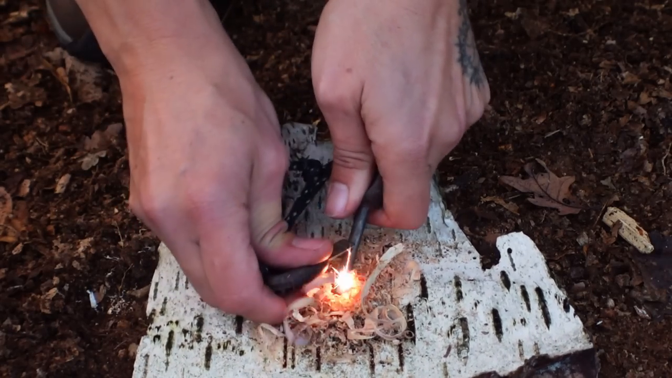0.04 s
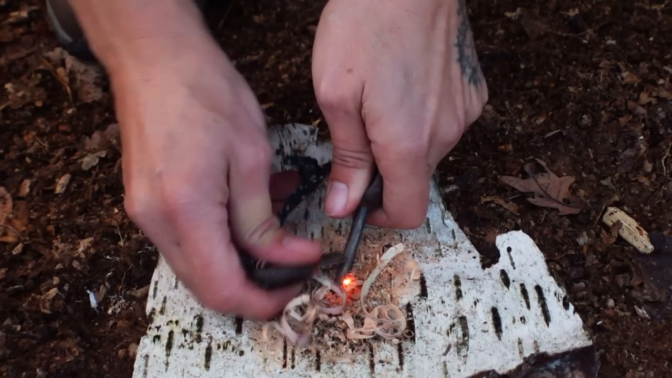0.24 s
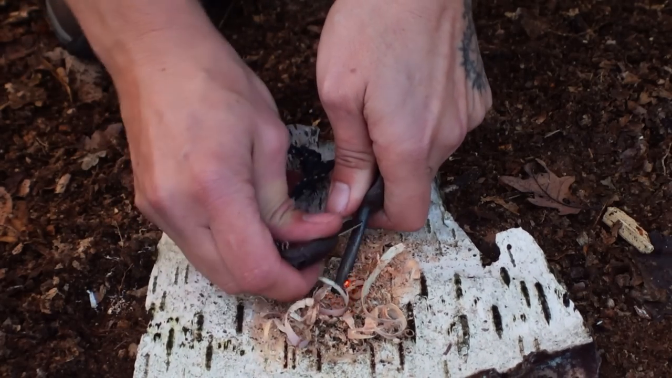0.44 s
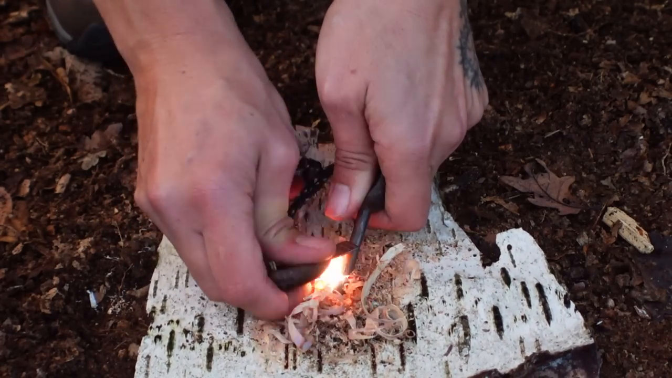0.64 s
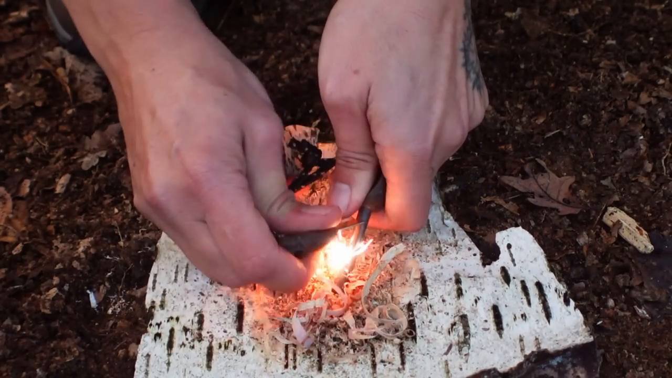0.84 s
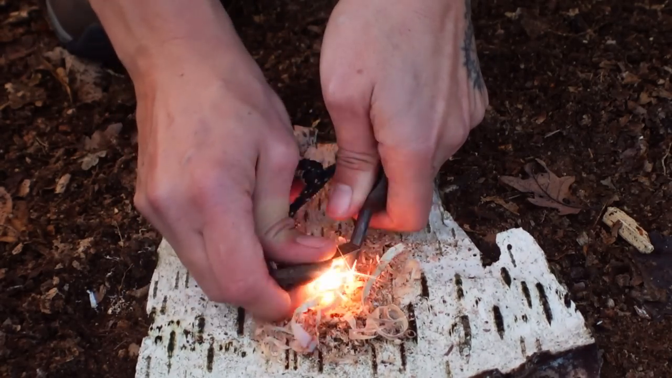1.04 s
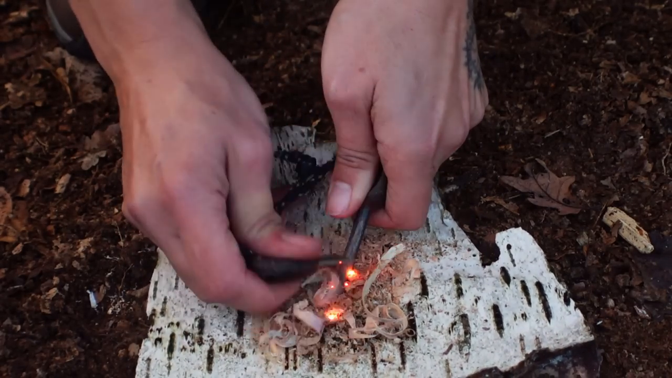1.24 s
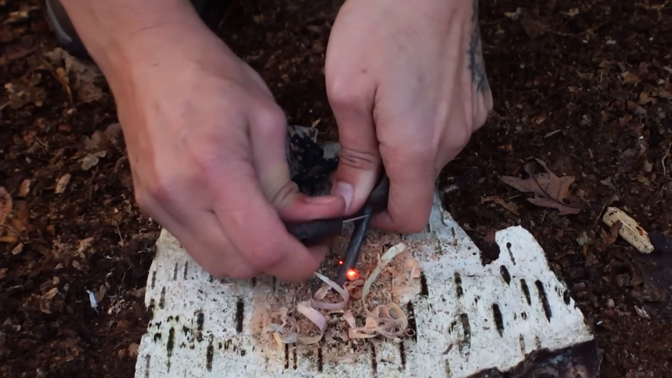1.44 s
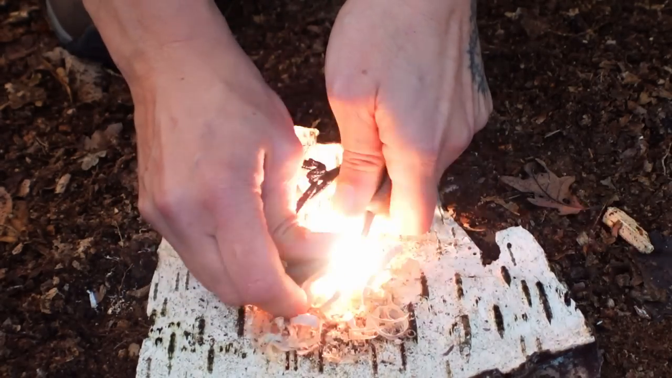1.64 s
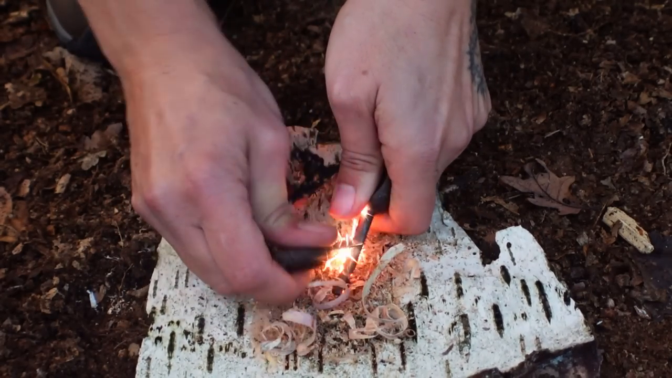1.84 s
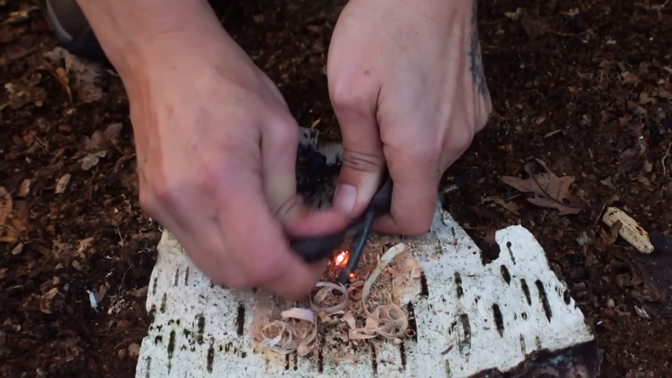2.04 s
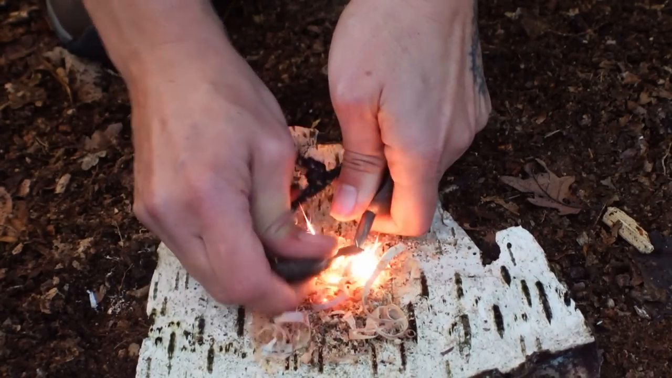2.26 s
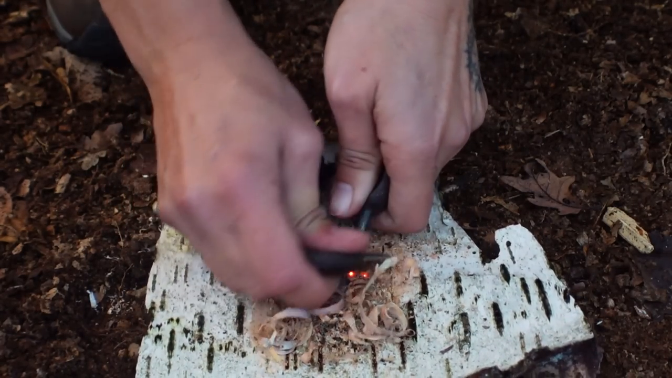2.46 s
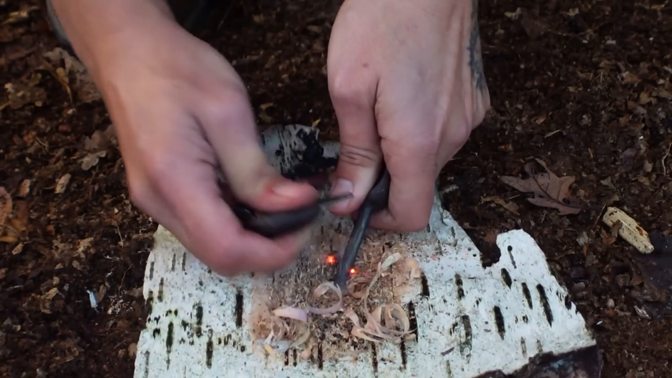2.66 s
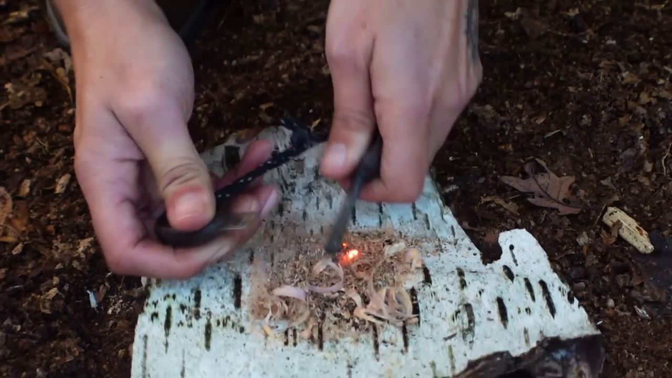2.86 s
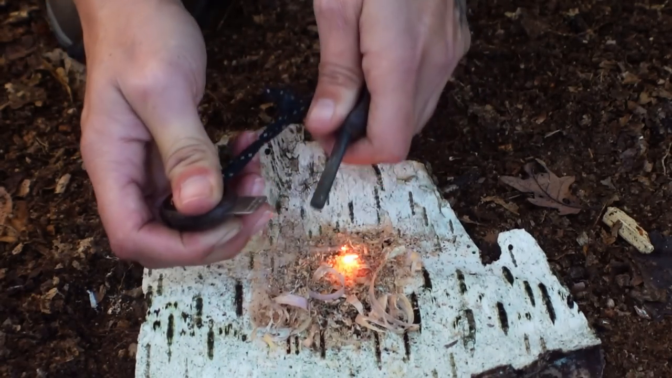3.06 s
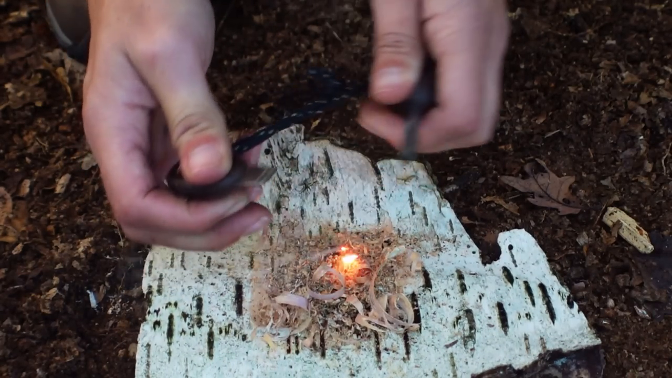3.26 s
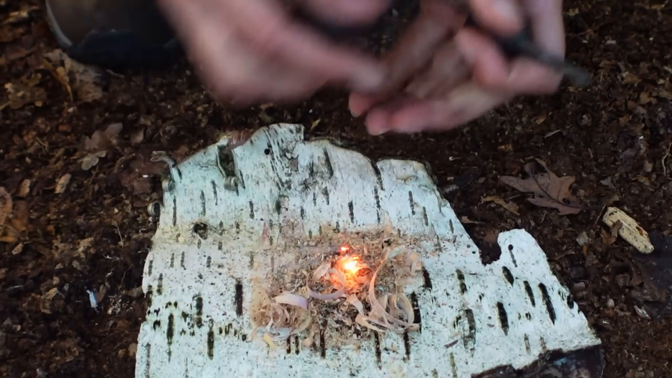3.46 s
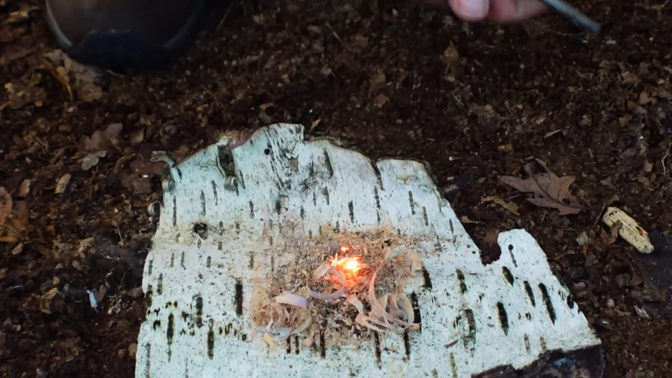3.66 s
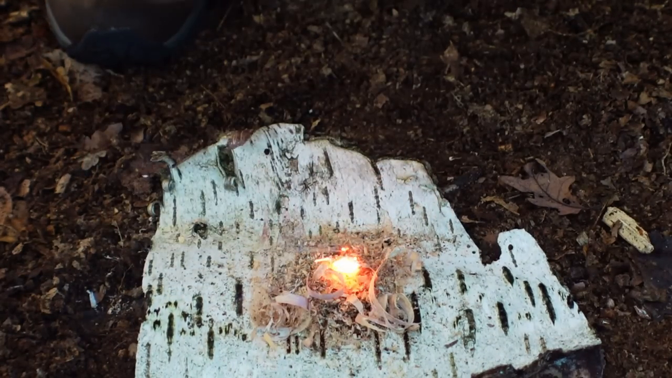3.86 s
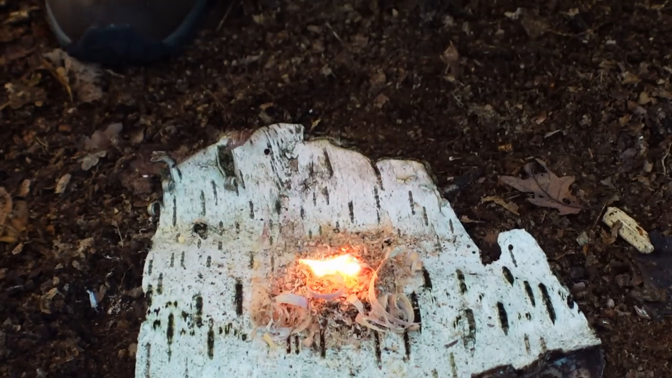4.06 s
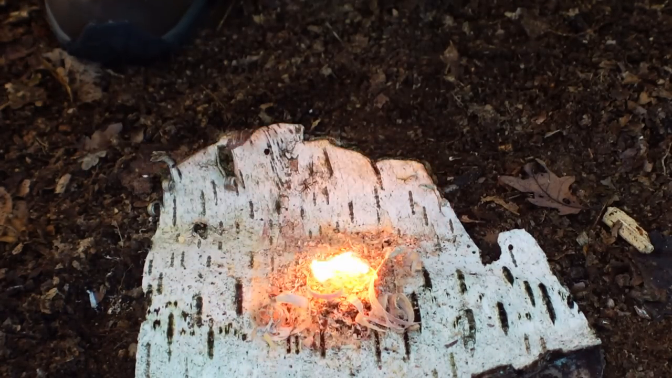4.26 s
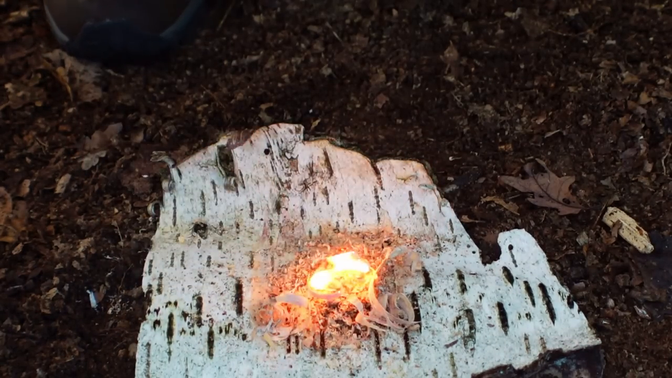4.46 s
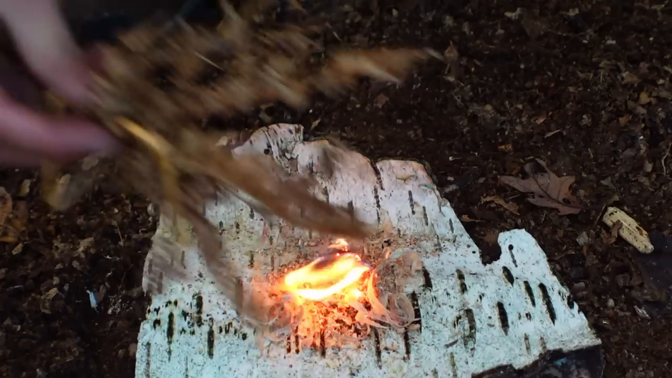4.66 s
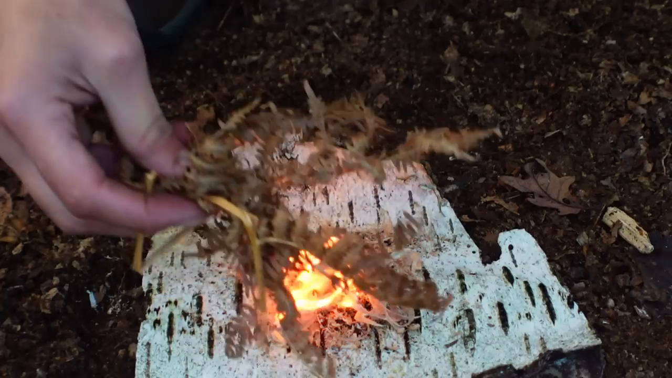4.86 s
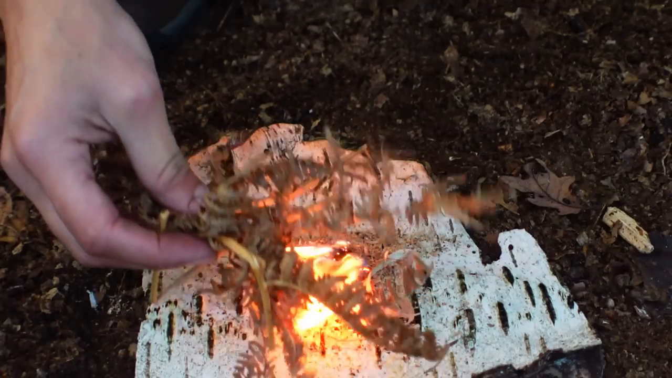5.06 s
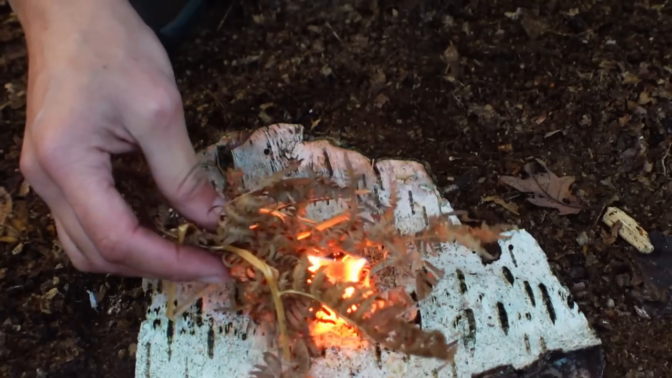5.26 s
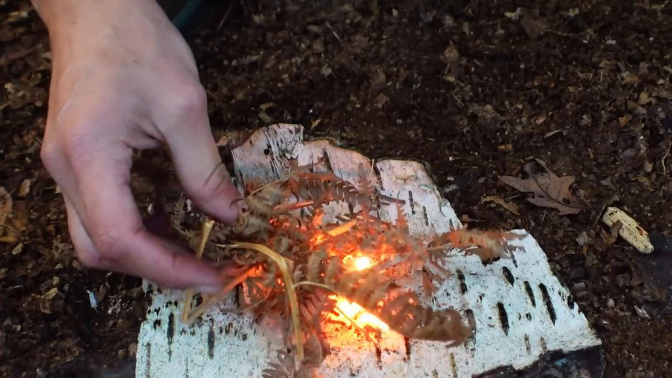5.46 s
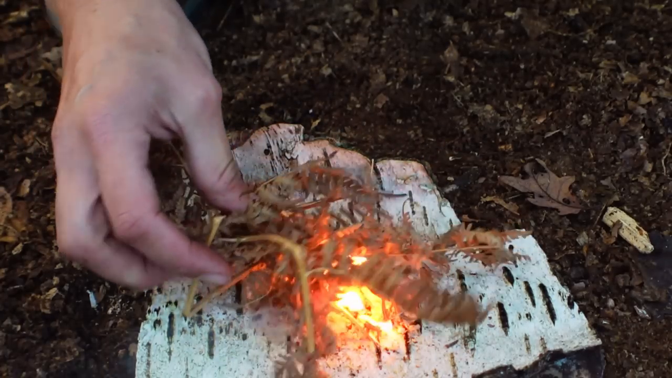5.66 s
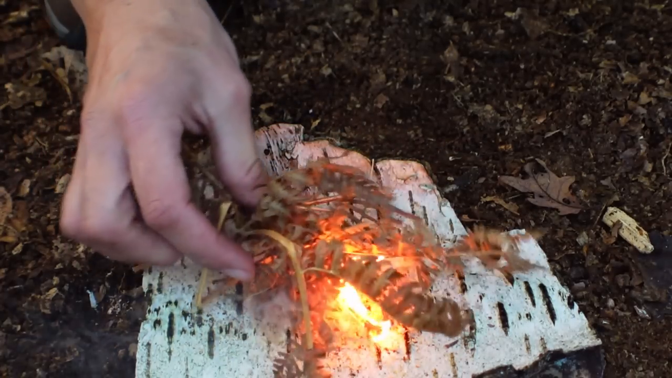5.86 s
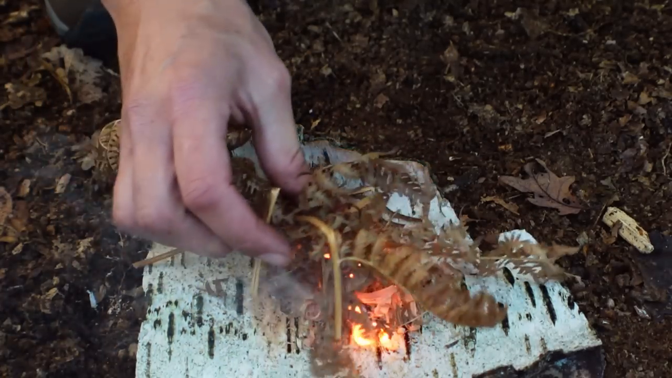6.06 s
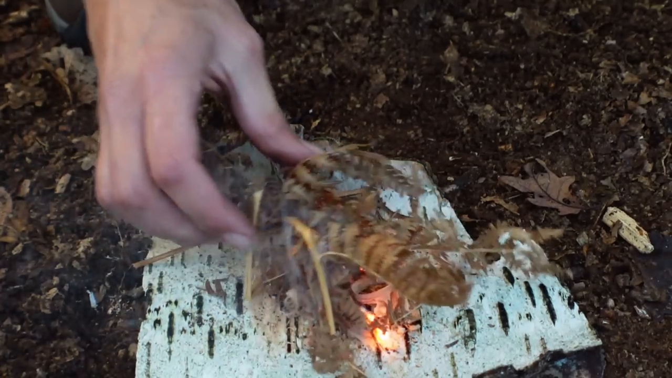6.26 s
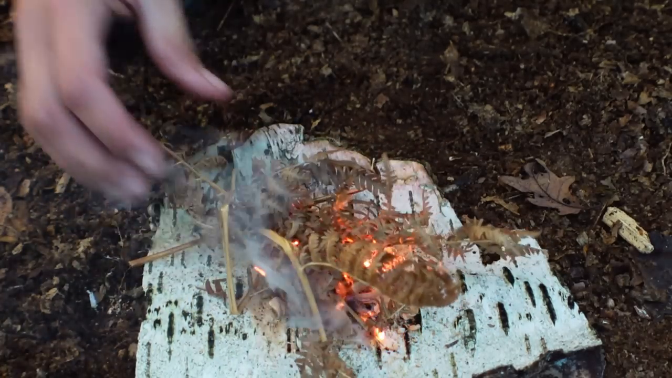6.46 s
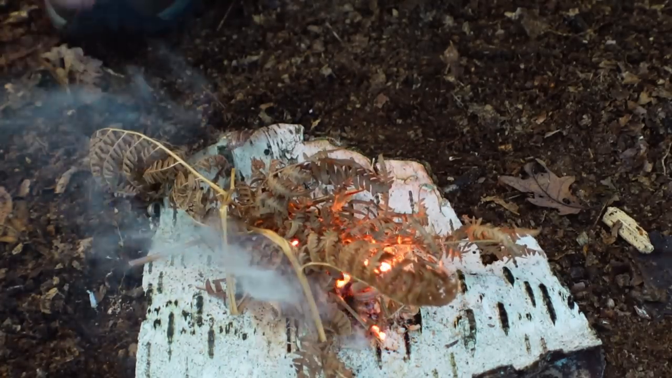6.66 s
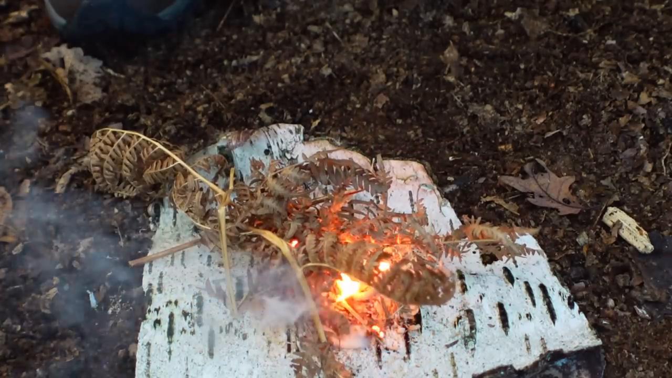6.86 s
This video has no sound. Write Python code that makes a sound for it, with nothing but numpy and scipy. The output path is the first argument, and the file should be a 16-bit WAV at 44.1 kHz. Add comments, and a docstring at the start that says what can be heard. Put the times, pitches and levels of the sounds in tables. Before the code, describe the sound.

Steel scrapes in short gritty strokes along a metal rod, snapping sparks, then a clink, a soft flame hiss and dry fern crackle outdoors.

```python
"""Short hard scrapes of a steel striker on a ferro rod, snapping sparks, then hiss and crackle of a small flame.
Each stroke is a run of catch-and-slip pushes coloured by the bite of the edge and its place along the rod.
Chips, taps, clinks and fibres are single snaps through resonant bodies; squeaks are lightly chattering drags.
Flame, dry fern and a faint forest rush are coloured noise spread in stereo, the last with a low sine hum."""
import sys
import numpy as np
from scipy import signal
from scipy.fft import rfft, irfft, next_fast_len
from scipy.io import wavfile
from scipy.ndimage import map_coordinates

SR = 44100
rng = np.random.default_rng(int(sys.argv[2]) if len(sys.argv) > 2 else 0)


def unload_wav(signal):
    """Save mono or channel-first audio to the path in sys.argv[1] as 16-bit WAV at rate SR, clipped to [-1, 1]."""
    wavfile.write(
        sys.argv[1],
        SR,
        np.round(np.clip(np.atleast_2d(signal).T, -1, 1) * 32767).astype(np.int16),
    )


N = 304995

# pushes of the striker along the rod:
# (start [s], length [s], level [dB], fade over the push [dB], bite [0 skidding - 1 cutting])
PUSHES = [(.006, 0.051, -29.5, -4, 0.088), (0.099, 0.049, -40.5, -4, 1), (0.158, 0.024, -26.5, -0.5, 0.024),
          (.302, 0.082, -35.5, 14.5, 0.3), (.521, 0.053, -35, -1.5, 0.17), (0.572, 0.044, -32.5, 8, 0.43),
          (.621, 0.027, -36.5, 4, 0.82), (0.646, 0.0092, -27, 3, .2), (0.657, 0.028, -45, 9, 0.54),
          (.699, 0.058, -37, 5, 0.94), (0.771, 0.05, -37, 11, 0.34), (.831, 0.078, -35, 16, 0.59),
          (0.925, 0.024, -36, 8, 0.74), (0.983, 0.025, -34, -1, .3), (1.006, 0.052, -30.5, 8, 0.26),
          (1.06, 0.028, -30.5, 8, 0.88), (1.122, 0.035, -26, 1.5, 0.29), (1.155, 0.07, -31.5, 4, 1),
          (1.236, 0.052, -39, 7, 0.51), (1.642, 0.047, -34.5, -0.5, 0.23), (1.694, 0.073, -34, 12, 0.83),
          (1.767, 0.063, -38, 14, 0.32), (1.819, 0.085, -34.5, 12.5, 1), (1.91, 0.034, -36, 3, 0.45),
          (2.094, 0.059, -36.5, 4, 0.29), (2.141, 0.063, -32.5, -0.5, 0.74), (2.205, 0.035, -31, 11, 0.3),
          (2.24, .014, -34.5, 2, .9), (2.259, 0.022, -25.5, -1, .85), (2.298, .032, -31.5, 8, .95),
          (2.335, 0.066, -34.5, 9.5, 0.36), (2.456, 0.083, -45, 1, 0.05)]
# long strokes down the rod, rubbing lightly: (start [s], end [s], rubbing level [dB])
STROKES = [(-.25, 0.41, -55), (0.51, 0.953, -52.5), (0.971, 1.27, -51), (1.635, 1.943, -55.5),
           (2.079, 2.9, -52.5)]
# the fern pressed down, shifted and let go: (middle [s], length [s], level [dB])
RUSTLES = [(5.179, 0.25, -53), (5.41, .2, -55.5), (5.62, .2, -58), (6.028, 0.23, -62.5),
           (6.301, .15, -61.5), (6.878, 0.36, -55.5)]


def amp(db):
    """Gain of a level in dB."""
    return 10 ** (np.asarray(db) / 20)


def unit(x):
    """x scaled to rms 1."""
    return x / np.sqrt(np.mean(x ** 2) + 1e-20)


def along(points, hz):
    """(Hz, value) points interpolated on a log frequency axis."""
    f, v = np.transpose(points)
    return np.interp(np.log(hz + 1), np.log(f + 1), v)


def curve(rows):
    """(s, value) rows as one value per sample."""
    return np.interp(np.arange(N) / SR, *np.transpose(rows))


def wobble(knots_per_s, size):
    """A smooth random curve through normally distributed knots."""
    knots = rng.standard_normal(int(size * knots_per_s / SR) + 4)
    return map_coordinates(knots, [np.arange(size) * knots_per_s / SR])


def swells(rows):
    """(middle s, length s, dB) rows as one gain that rises and falls smoothly for each."""
    t = np.arange(N) / SR
    return sum(amp(db) * np.cos(np.pi * np.clip((t - middle) / length, -.5, .5)) for middle, length, db in rows)


def octaves(hz, centre):
    """Distance from a centre in octaves."""
    return np.log2((hz + 1) / centre)


def above(hz, corner):
    """Octaves above a corner, 0 below it."""
    return octaves(np.maximum(hz, corner), corner)


def hump(hz, centre, width):
    """A bell of height 1, width in octaves."""
    return np.exp(-.5 * (octaves(hz, centre) / width) ** 2)


def filtered(x, response):
    """x times a response of frequency."""
    m = next_fast_len(N + SR // 2)
    return irfft(rfft(x, m) * response(np.fft.rfftfreq(m, 1 / SR)), m)[..., :N]


def ring(x, colour, size=2048):
    """x through a causal minimum-phase body whose gain in dB is colour(Hz)."""
    cepstrum = irfft(np.log(amp(colour(np.fft.rfftfreq(size, 1 / SR))) + 1e-6))
    cepstrum[1:size // 2] *= 2
    cepstrum[size // 2 + 1:] = 0
    return signal.fftconvolve(x, irfft(np.exp(rfft(cepstrum))))


def add(track, s, x):
    """Mix x into the track at time s."""
    part = track[max(0, round(s * SR)):][:len(x)]
    part += x[:len(part)]


def stereo(source, colour, alike):
    """Two draws of a source, coloured and spread by left-right likeness, rms 1."""
    def turn(hz):
        return np.arccos(np.clip(along(alike, hz), -1, 1)) / 2

    def mid_side(hz):
        return amp(colour(hz)) * [np.cos(turn(hz)), np.sin(turn(hz))]

    mid, side = filtered(np.array([source(), source()]), mid_side)
    return unit(np.array([mid + side, mid - side]))


def grit(hits_per_s, spread_db, size):
    """Tiny fractures at random moments and of uneven strength, rms 1."""
    hits = rng.random(size) < hits_per_s / SR
    strength_db = spread_db * np.minimum(rng.standard_normal(size), 2)
    return unit(hits * rng.choice([-1, 1], size) * amp(strength_db))


def snap(db, colour, tail, t60_s, tear=0.18, tear_s=0.00044):
    """One sharp release, a brief tearing and dying splinters; db is the level of its first 3 ms."""
    t = np.arange(SR // 20) / SR
    push = rng.standard_normal(len(t)) * (tail * amp(-60 * t / t60_s) + tear * np.exp(-t / tear_s))
    push[0] -= 1
    x = ring(push, colour)
    return amp(db) * x / np.sqrt(np.mean(x[:132] ** 2))


def tool_db(hz, ring_db=3, width_hz=40):
    """The hand-held tools' colour: a broad shape with resonances damped by the fingers."""
    # broad shape: (frequency [Hz], gain [dB])
    shape = [(25, -47), (100, -26), (300, -21.5), (520, -12.5), (850, -4), (1400, -3.5), (2200, -2),
             (2700, 1.5), (3200, -5), (3800, -3.5), (4500, -8.5), (6200, -7.5), (7500, -10.5), (10000, -13),
             (15500, -18.5)]
    # narrow resonances: frequency [Hz]
    ring_hz = [860, 1150, 1400, 1620, 1800, 2550, 2840, 3750, 4000, 4630, 4880, 5520, 6150, 6640, 7000]
    return along(shape, hz) + ring_db * sum(1 / (1 + ((hz - c) / width_hz) ** 2) for c in ring_hz)


def contact_db(depth_db, knots_per_octave=3.11):
    """Each place of contact favours resonances of its own: a random ripple over frequency."""
    knots = rng.standard_normal(120)

    def ripple(hz):
        place = [knots_per_octave * np.log2(1 + hz / 300)]
        return depth_db * map_coordinates(knots, place, mode="nearest") * np.minimum(hz / 1500, 1)

    return ripple


def slipping(slips_per_s, scatter, size):
    """A sawtooth that leaps to 1 at each slip and dies away; scatter makes the slips uneven."""
    settle_s = 0.0058
    t = np.arange(size) / SR
    slips = np.append(0, np.cumsum(np.exp(scatter * rng.standard_normal(size=64)) / slips_per_s))
    last_slip = slips[np.searchsorted(slips, t, side="right") - 1]
    return np.exp(-(t - last_slip) / settle_s)


def rub(length, db, fade_db, slip_db, scatter, ripple_db, colour):
    """One push of the edge, catching and slipping; colour(Hz, 0 or 1) is its tone at the start and the end."""
    touch_s, release_s, slips_per_s = 0.0021, 0.0048, 130
    length = max(length, .005)
    t = np.arange(round((length + .016) * SR)) / SR
    n, travel = len(t), np.minimum(t / length, 1)
    teeth = grit(4000, 1.84, n) + 0.56 * rng.standard_normal(n)
    slips_db = slip_db * slipping(slips_per_s, scatter, n)
    flutter_db = 2.8 * np.tanh(wobble(573, n)) + 3.4 * np.tanh(wobble(185, n))
    touch = (1 - np.exp(-t / touch_s)) * np.exp(-np.maximum(t - length, 0) / release_s)
    force = teeth * amp(slips_db + flutter_db) * touch * amp(-fade_db * travel)
    # the resonances shift as the contact travels down the rod
    x = 0
    for late, share in enumerate((np.cos(travel * np.pi / 2), np.sin(travel * np.pi / 2))):
        place = contact_db(ripple_db, knots_per_octave=14)
        x = x + ring(force * share, lambda hz: colour(hz, late) + place(hz))
    return amp(db) * np.sqrt(length * SR) * x / np.linalg.norm(x)


def forest():
    """A steady, faraway rush among the trees as wavering noise, with a faint low hum as a wavering sine."""
    # rush level before the side balance: (time [s], level [dB])
    rush_level = [(0, -53), (2.5, -53.5), (3.3, -57), (4, -55), (5.3, -55.5), (6.3, -57), (6.92, -55)]
    # rush colour: (frequency [Hz], gain [dB])
    rush_colour = [(15, -74.5), (25, -38), (80, -13), (133, -7.5), (165, -7), (557, -14), (672, -7),
                   (881, -0.5), (1090, -4.5), (1390, -3), (1870, -9.5), (2150, -14.5), (3490, -19),
                   (6850, -26.5), (15800, -39)]
    # (frequency [Hz], left-right likeness [-1 to 1])
    likeness = [(25, .8), (60, 0.94), (250, 0.768), (500, 0.43), (1000, 0.71), (3000, 0.59), (10000, 0.34)]
    # hum amplitude before wavering and side balance: (time [s], level [dB])
    hum_level = [(0, -88), (.35, -68), (1.9, -69), (2.7, -80), (3.2, -87), (4.8, -86), (5.3, -72),
                 (6.9, -82)]
    hum_hz, balance_db = 117, .4
    air = lambda: rng.standard_normal(N) * amp(0.94 * wobble(9, N))
    rush = amp(curve(rush_level)) * stereo(air, lambda hz: along(rush_colour, hz), likeness)
    hum_gain = amp(curve(hum_level) + 2.8 * wobble(8.4, N))
    hum = hum_gain * np.sin(2 * np.pi * np.cumsum(hum_hz + 2.66 * wobble(9, N)) / SR)
    return (rush + hum) * amp([[-balance_db], [balance_db]])


def fern():
    """Dry fronds rustle as grit and noise; stems creak as they rub, slips ringing a narrow resonance."""
    # frond colour: (frequency [Hz], gain [dB])
    frond_colour = [(900, -29), (2000, -2.5), (3000, 1), (3600, -4), (4500, -4), (5200, -3.5), (6000, -4.5),
                    (8500, -6.5), (11000, -15.5), (16000, -28)]
    # stems rubbing: (start [s], end [s], level [dB], pitch [Hz])
    creaks = [(4.962, 5.19, -65.5, 4360), (5.958, 6.228, -67, 2940)]
    lands_s, rest_db = 3.4, -63.5  # from then on it stirs faintly over the flame
    fronds = lambda: (grit(600, 4.2, N) + 0.77 * rng.standard_normal(N)) * amp(2.6 * wobble(35, N))
    stems = np.zeros(N)
    for start, end, db, pitch_hz in creaks:
        n = round((end - start) * SR)
        slips = grit(500, 4, n) * amp(5.6 * wobble(55, n)) * signal.windows.tukey(n, .5)
        resonance = lambda hz: -20 * np.log10(1 + (octaves(hz, pitch_hz) / .11) ** 2)
        add(stems, start, amp(db) * unit(ring(slips, resonance)))
    resting = amp(rest_db) * curve([(lands_s - .1, 0), (lands_s, 1)])
    stirring = np.hypot(swells(RUSTLES), resting)
    return stems + stirring * stereo(fronds, lambda hz: along(frond_colour, hz), [(3000, 0.92)])


def flame(flutter_db=1.5):
    """Gas hisses out of the shavings as fluttering noise: smooth in the flare, ticking while they smoulder."""
    # hiss as it smoulders, flares and is smothered, before the fade-in: (time [s], level [dB])
    hiss_level = [(2.9, -63), (3.6, -71), (3.85, -57.5), (4.15, -65.5), (4.4, -42), (4.79, -37),
                  (4.95, -42.5), (5.05, -58.5), (5.65, -57.5), (6.3, -66.5), (6.9, -63)]
    # hiss colour: (frequency [Hz], gain [dB])
    hiss_colour = [(60, -34), (700, -14), (1500, -8), (2100, -2), (3000, -6.5), (4500, -1), (6400, 0.5),
                   (8000, -1), (12000, -2), (15800, -6)]
    # hiss fade-in: (time [s], gain [0-1])
    fade_in = [(2.8, 0.24), (3.05, 0.7)]
    # a shaving fizzes briefly, before the fade-in: middle s, length s, dB
    sputter = [(3.866, .055, -45.5)]
    level_db = curve(hiss_level)
    ticking = np.clip(.25 + 0.017 * (level_db.max() - level_db), .1, .8)
    fizz = lambda: (rng.standard_normal(N) + ticking * grit(110, 12.0, N)) * amp(flutter_db * wobble(45, N))
    hiss = stereo(fizz, lambda hz: along(hiss_colour, hz), [(3000, 0.993), (12000, 0.94)])
    return curve(fade_in) * (amp(level_db) + swells(sputter)) * hiss


def crack(db, centre_hz):
    """One dry fibre snaps; thick ones give a duller, longer pop."""
    width = np.clip(1.6 * (centre_hz / 4000) ** .5, 1.2, 2.4)
    fibre = contact_db(depth_db=1.5, knots_per_octave=4)
    colour = lambda hz: 30 * (hump(hz, centre_hz, width) - 1) + fibre(hz)
    return snap(db, colour, tail=0.076, t60_s=0.025 * (3000 / centre_hz) ** .5)


def crackle():
    """Fibres snap in the heat and wherever the fern is moved, and the fern bumps the bark."""
    # loudest snaps of burning shavings and fern: (time [s], level [dB], centre [Hz])
    loud_snaps = [(3.845, -37, 6000), (3.8625, -31.5, 5600), (3.8683, -38, 7060), (3.9263, -44, 4530),
                  (4.0854, -47.5, 1830), (4.1736, -48, 5160), (4.2321, -42, 2010), (4.3006, -36, 1600),
                  (4.373, -45, 2180), (4.4436, -41.5, 3240), (4.858, -39, 5300), (4.993, -42, 4400),
                  (5.186, -37, 3970), (5.2179, -38.5, 5000), (5.2482, -41.5, 1350), (5.389, -39, 3650),
                  (5.417, -43.5, 4640), (5.4542, -32.5, 5900), (5.5583, -41.5, 6300), (5.597, -44, 5700),
                  (5.6502, -42.5, 5500), (5.6843, -40, 4470), (6.3235, -47.5, 5350), (6.7872, -46, 4670),
                  (6.876, -45, 3940)]
    # fern landing on the bark sheet: (time [s], level [dB], centre [Hz])
    bumps = [(4.85, -39.5, 610), (4.955, -37.5, 1900)]
    # fine snaps during a rustle: rate, mean level over the rustle, middle colour
    twigs_per_s, twig_db, twig_hz = 30, 5, 3800
    out = np.zeros(N)
    for s, db, centre_hz in loud_snaps:
        add(out, s, crack(db, centre_hz))
    for middle, length, db in RUSTLES:
        for when, strength, thinness in rng.uniform(-1, 1, (round(twigs_per_s * length), 3)):
            twig = crack(db + twig_db + 4 * strength, twig_hz * 2 ** (1.1 * thinness))
            add(out, middle + when * length / 2, twig)
    for s, db, centre_hz in bumps:
        width = 2.6 * (600 / centre_hz) ** 0.79
        colour = lambda hz: 30 * (hump(hz, centre_hz, width) - 1)
        add(out, s, snap(db, colour, tail=0.37, t60_s=0.023))
    return out


def clinks():
    """Loose steel meets the rod: a crack and a brief, clattering ring."""
    # loosely held tools meeting: (time [s], level [dB])
    hits = [(2.862, -34.5), (2.8696, -21), (2.8783, -22.5), (3.0396, -40)]
    # resonances of the loose tools: (frequency [Hz], gain [dB])
    steel = [(1820, 9.5), (2450, 5), (3220, 11), (4880, 10), (5850, 11), (6630, 2), (7300, 6), (8600, 9),
             (9100, 7), (9850, 2), (10600, 8.5)]
    width_hz = 170
    modes = lambda hz: sum(db / (1 + ((hz - c) / width_hz) ** 2) for c, db in steel)
    colour = lambda hz: 36 * (hump(hz, 3600, 2.46) - 1) + modes(hz)
    out = np.zeros(N)
    for s, db in hits:
        add(out, s, snap(db, colour, tail=0.088, t60_s=0.045))
    return out


def taps():
    """The edge skips on the rod under a light touch, the ring quickly stopped by the hands."""
    # (time [s], level [dB], nominal centre [Hz])
    skips = [(1.3985, -33, 1810), (1.6256, -41, 2208), (2.4858, -37, 1698), (2.624, -39.5, 2090),
             (2.6761, -33.5, 1960), (2.6898, -27.5, 2050), (2.7016, -28.5, 2050), (2.711, -38, 2010),
             (2.991, -47.5, 2080)]
    out = np.zeros(N)
    for s, db, centre_hz in skips:
        knock = lambda hz: 15 * hump(hz, centre_hz * .96, .36) + 12 * hump(hz, centre_hz * 2.03, .3)
        colour = lambda hz: tool_db(hz) + knock(hz) - 4 * above(hz, 4800)
        add(out, s, snap(db, colour, tail=0.11, t60_s=0.023))
    return out


def gliding(settle_s=.02, lift_s=0.086):
    """Light, grainy rubbing of steel that stays on the rod throughout each stroke."""
    t = np.arange(N) / SR
    contact = 0
    for start, end, db in STROKES:
        lift = np.exp(-np.maximum(t - end, 0) / lift_s)
        contact = contact + amp(db) * np.clip((t - start) / settle_s, 0, 1) * lift
    force = (grit(2000, 7.7, N) + .5 * rng.standard_normal(N)) * amp(2.6 * wobble(110, N))
    colour = lambda hz: tool_db(hz) + 7 * hump(hz, 2090, 0.12) - 3 * above(hz, 5000)
    return contact * unit(ring(force, colour)[:N])


def squeaks(pitch_db=17, overtone_db=9, tilt_db=-3, rise=0.096, chatter_db=13):
    """A light drag chatters almost evenly and sings at one rising pitch with a weaker overtone."""
    # (start [s], length [s], level [dB], middle pitch [Hz])
    drags = [(0.082, 0.0083, -38.5, 2240), (.362, .026, -41, 2150), (0.425, 0.012, -49.5, 2090),
             (1.236, 0.014, -35.5, 2200), (1.939, 0.029, -32, 2418), (2.667, 0.065, -44, 1960),
             (2.765, 0.074, -46, 2200)]
    out = np.zeros(N)
    for start, length, db, middle_hz in drags:
        def colour(hz, late):
            pitch_hz = middle_hz * (1 + rise * (late - .5))
            song = pitch_db * hump(hz, pitch_hz, 0.21) + overtone_db * hump(hz, pitch_hz * 1.9, 0.12)
            return tool_db(hz) + song + tilt_db * above(hz, 700)

        add(out, start, rub(length, db, fade_db=5, slip_db=chatter_db, scatter=.3, ripple_db=1.5, colour=colour))
    return out


def chip(db):
    """A chip breaks away with a snap that rings the tools."""
    chip_hz = 3740
    place = contact_db(depth_db=1.8, knots_per_octave=4.87)
    colour = lambda hz: tool_db(hz) + 16 * hump(hz, chip_hz, 1.27) + place(hz)
    return snap(db, colour, tail=0.17, t60_s=0.0087)


def sparks(spread_db=6):
    """A few big chips, and small ones at random wherever the edge bites."""
    # biggest chips torn from the rod: (time [s], level [dB])
    big_chips = [(.122, -35), (.1527, -27), (0.5772, -29), (0.6027, -29), (0.6259, -25.5), (.63, -29),
                 (0.8408, -30), (0.8768, -29), (1.0535, -29), (1.154, -18), (1.2107, -19.5),
                 (1.6981, -25.5), (1.74, -33), (1.8223, -23), (1.8546, -20.5), (1.8987, -26), (1.958, -27),
                 (2.1605, -27), (2.1723, -33), (2.1855, -22.5), (2.1958, -26), (2.267, -22),
                 (2.2727, -17.5)]
    crumbs_per_s, crumb_db = 65, 2.5  # rate at full bite; highest level over mid-push
    out = np.zeros(N)
    for s, db in big_chips:
        add(out, s, chip(db))
    for start, length, db, fade_db, bite in PUSHES:
        chances = rng.random(size=(8, 3))
        for travel, chance, luck in chances:
            if chance < crumbs_per_s * bite ** 2 * length / len(chances):
                level_db = db + crumb_db - fade_db * (travel - .5) - spread_db * luck
                add(out, start + travel * length, chip(level_db))
    return out


def scraping():
    """A dull judder while the edge skids, bright and gritty when it bites; the top darkens towards the tip."""
    skid_hz, cut_hz = 1090, 3700  # the judder rises from skidding to cutting
    skid_judder_db, cut_judder_db = 9, 3.5  # and stands out less
    skid_tilt_db, cut_tilt_db = -1, 2.4  # per octave above 700 Hz
    travel_s = 0.31  # handle to tip
    tip_dull_db = 18  # loss per octave above 10.4 kHz at the tip when skidding
    handle_hz, tip_hz, squeal_db = 12000, 5100, 2.5  # the edge's whistle falls on the way
    thump_hz, thump_db = 240, 9.5  # a full bite shakes the bark under the rod
    slip_db = 8  # the edge jumps free and settles again; at full bite
    out = np.zeros(N)
    for start, length, db, fade_db, bite in PUSHES:
        since_stroke_s = min(start - s for s, _, _ in STROKES if s < start)
        down = min(since_stroke_s / travel_s, 1)

        def between(skid, cut):
            return skid + (cut - skid) * bite

        def colour(hz, late):
            judder_hz = skid_hz * (cut_hz / skid_hz) ** bite
            judder = between(skid_judder_db, cut_judder_db) * hump(hz, judder_hz, 0.51)
            squeal = squeal_db * hump(hz, handle_hz * (tip_hz / handle_hz) ** down, 0.24)
            tilt = between(skid_tilt_db, cut_tilt_db) * above(hz, 700)
            dulling = tip_dull_db * down * between(1, .4) * above(hz, 10400)
            thump = thump_db * bite * hump(hz, thump_hz, 0.49)
            return tool_db(hz) + judder + squeal + tilt - dulling + thump

        push = rub(length, db, fade_db, slip_db * between(0.54, 1), scatter=.7, ripple_db=3.5, colour=colour)
        add(out, start, push)
    return out


def ground(x, bounce=0.14, delay_s=.004, scatter_db=-28, t60_s=0.12):
    """The bark sheet returns one quick echo; the litter around scatters a faint short tail."""
    t = np.arange(SR // 4) / SR
    tail = rng.standard_normal((2, len(t))) * amp(-60 * t / t60_s)
    scatter = signal.fftconvolve(x[None], tail / np.linalg.norm(tail[0]), axes=1)[:, :N]
    echoed = filtered(x, lambda hz: 1 - bounce * np.exp(-2j * np.pi * hz * delay_s))
    return echoed + amp(scatter_db) * scatter


def ports(x):
    """Near sounds reach the two microphone ports slightly out of step."""
    # left lead for sounds close in front: (frequency [Hz], phase [rad])
    lead = [(500, 0.066), (2000, 0.0071), (4000, 0.043), (8000, 0.079), (14000, 0.044)]
    return filtered(x, lambda hz: np.exp(.5j * np.outer([1, -1], along(lead, hz))))


def scene():
    """Tools and crackle close in front, with flame, fern and forest around them."""
    near = scraping() + squeaks() + gliding() + sparks() + taps() + clinks() + crackle()
    return ports(ground(near)) + flame() + fern() + forest()


def record(dry):
    """A steep low-pass removes everything above the band limit."""
    top_hz = 15850
    return filtered(dry, lambda hz: 1 / np.sqrt(1 + (hz / top_hz) ** 160))


dry = scene()
out = record(dry)
unload_wav(out)
```